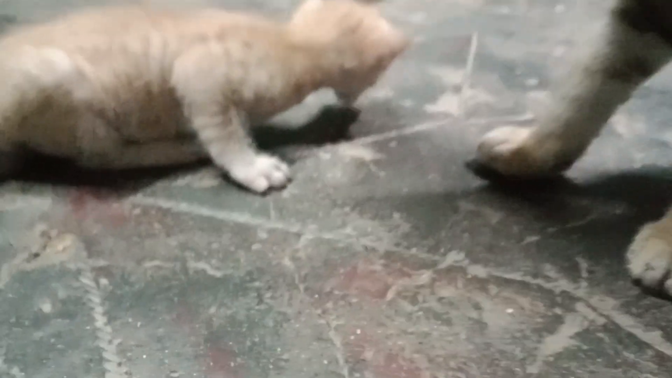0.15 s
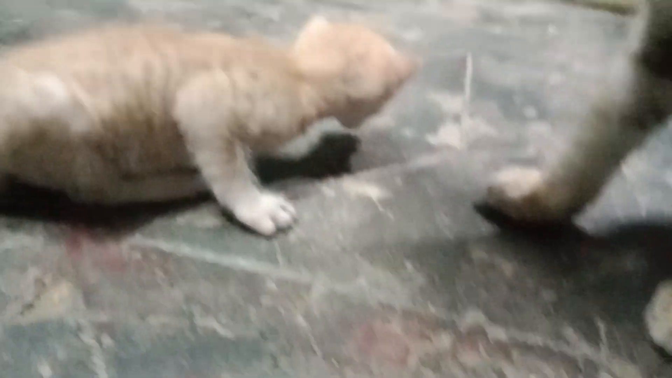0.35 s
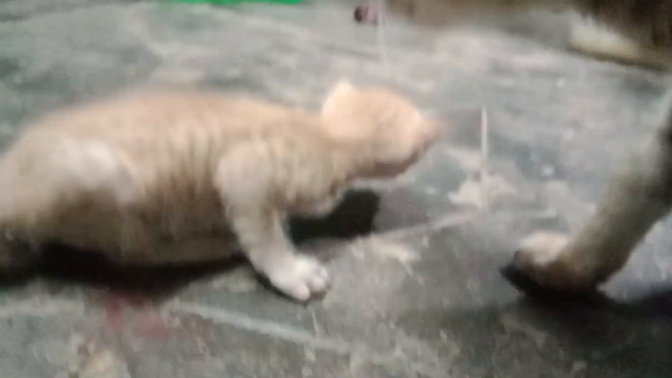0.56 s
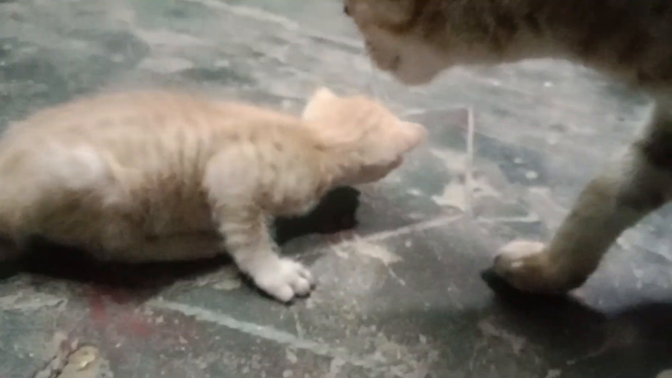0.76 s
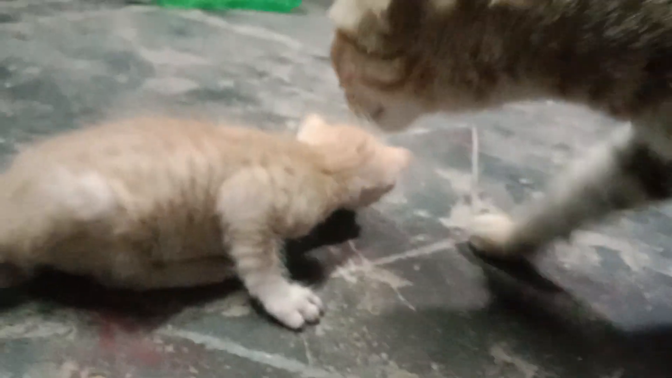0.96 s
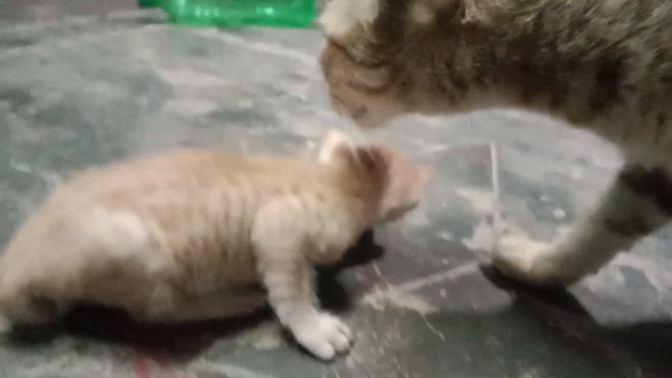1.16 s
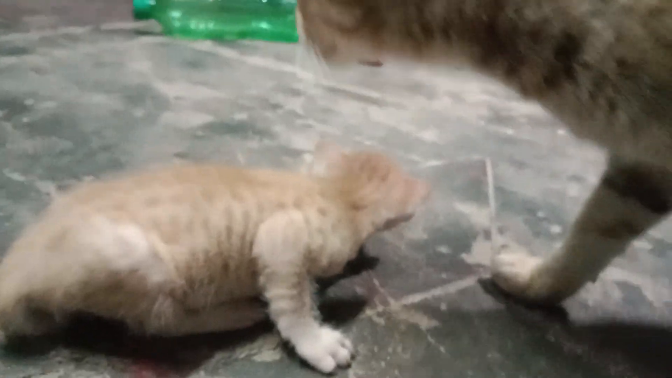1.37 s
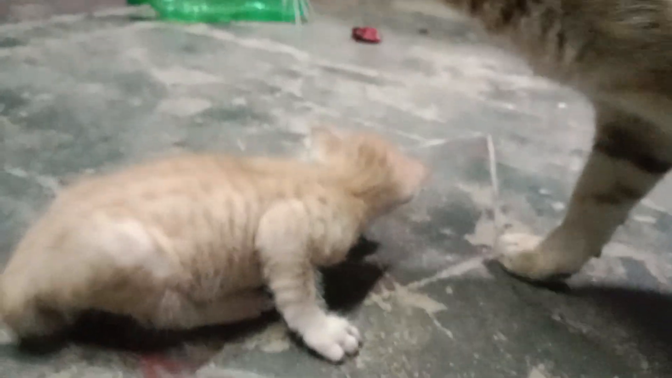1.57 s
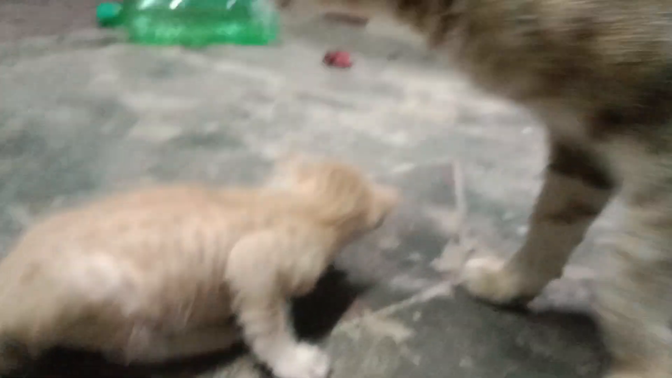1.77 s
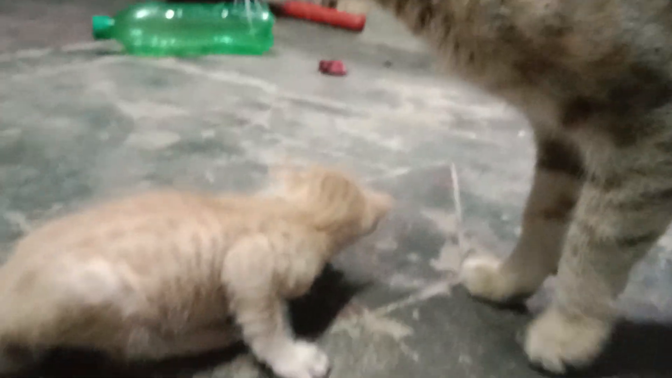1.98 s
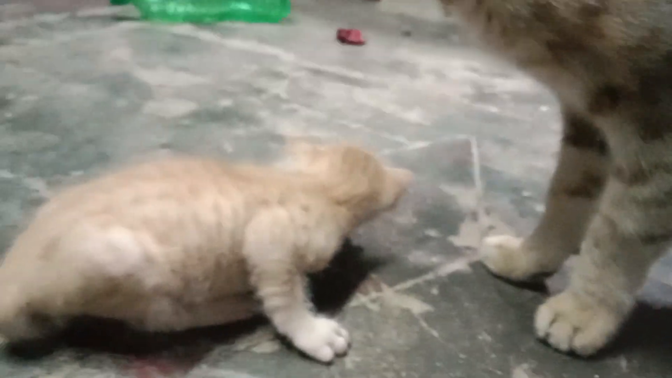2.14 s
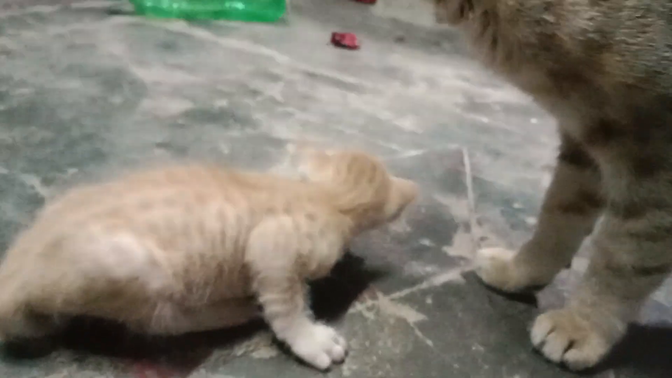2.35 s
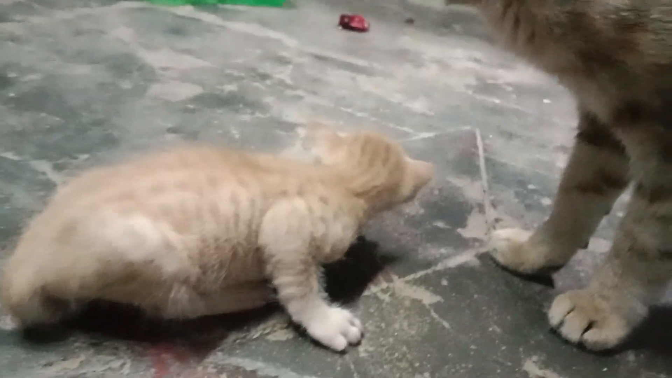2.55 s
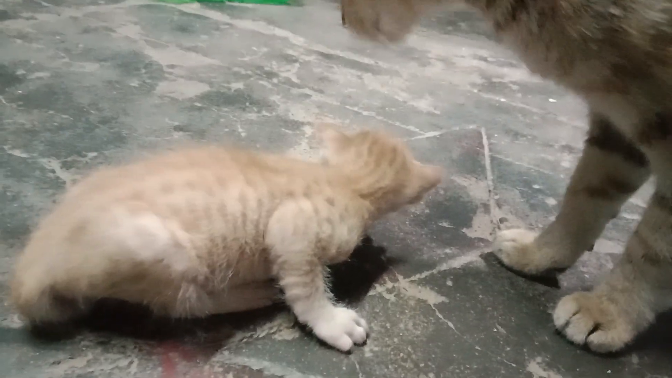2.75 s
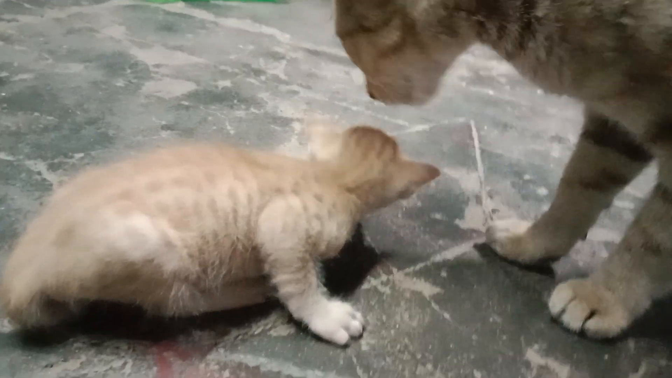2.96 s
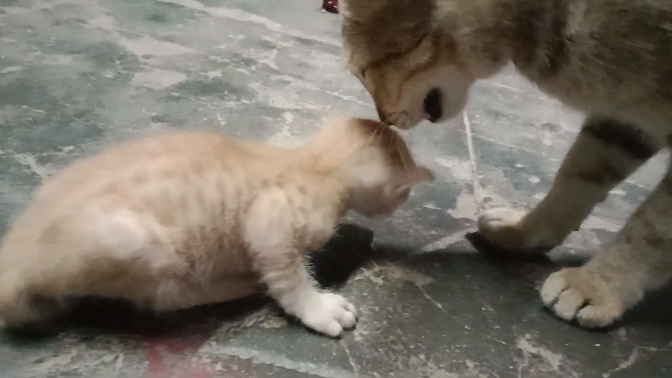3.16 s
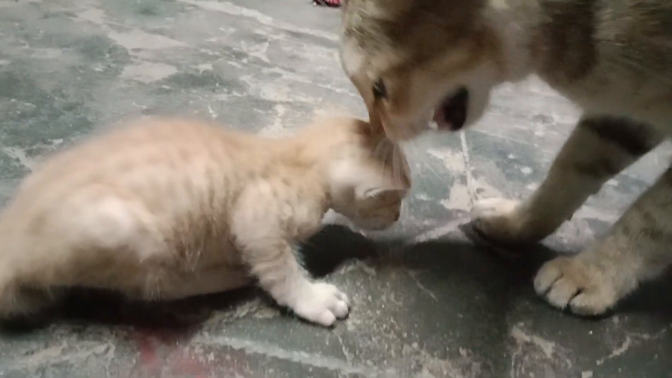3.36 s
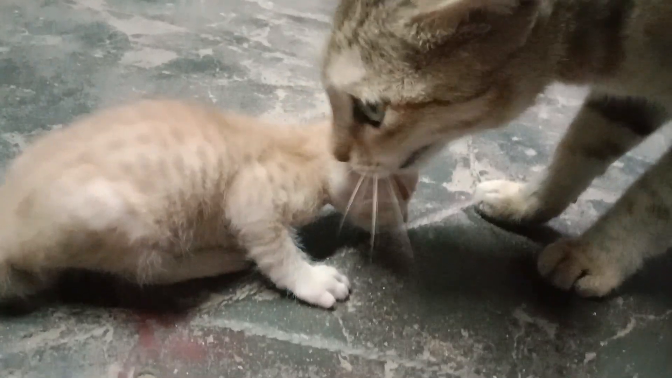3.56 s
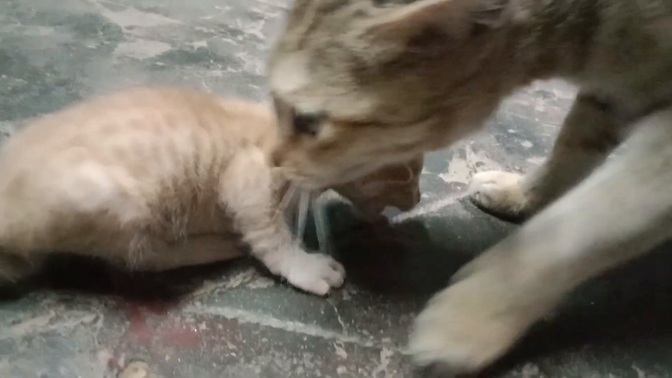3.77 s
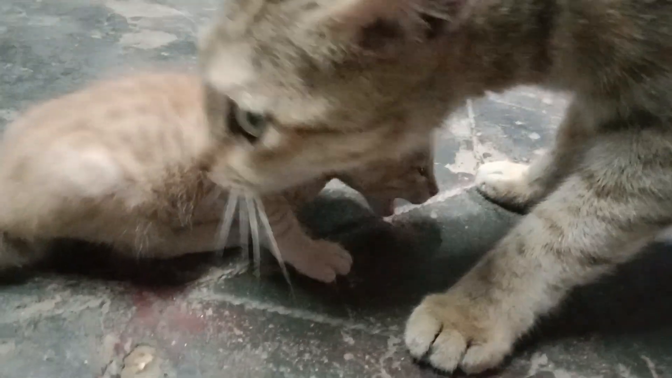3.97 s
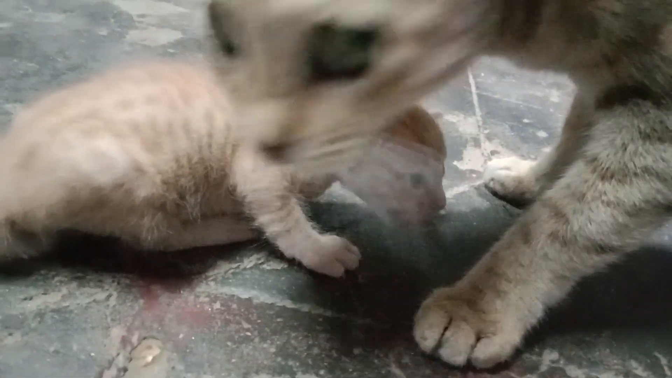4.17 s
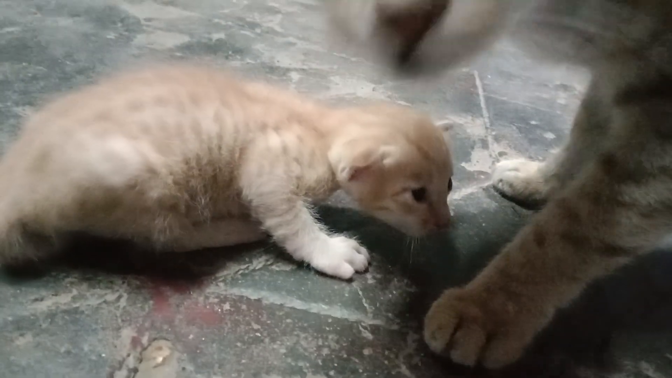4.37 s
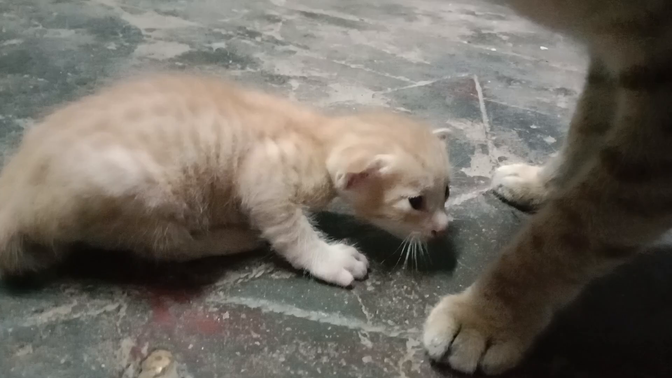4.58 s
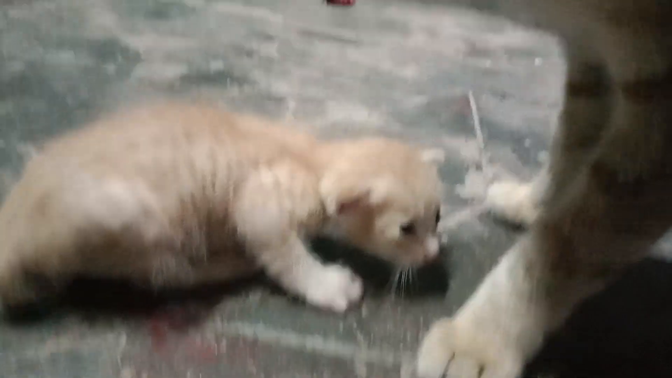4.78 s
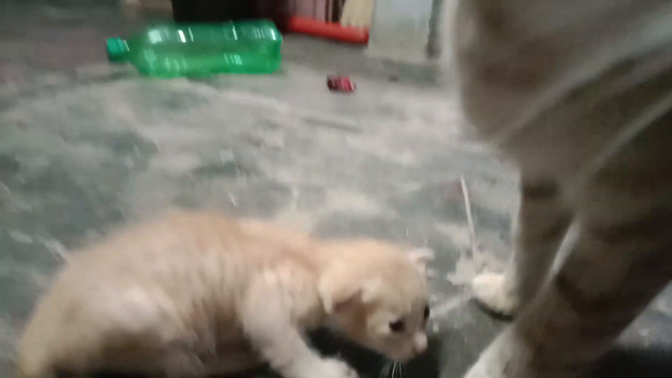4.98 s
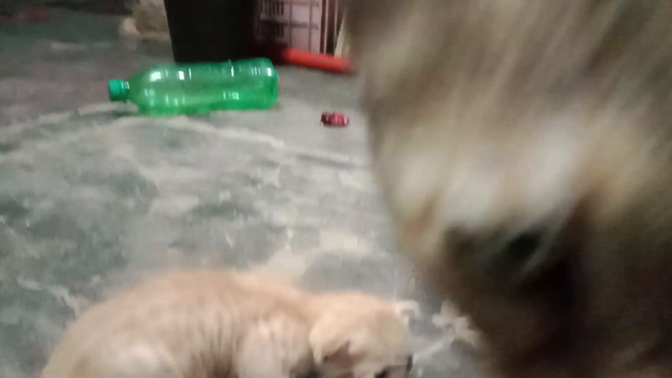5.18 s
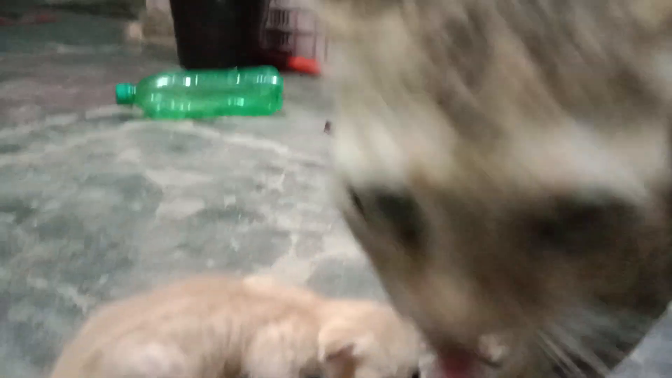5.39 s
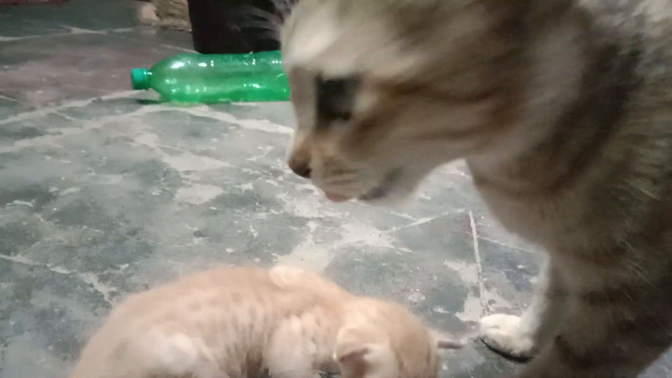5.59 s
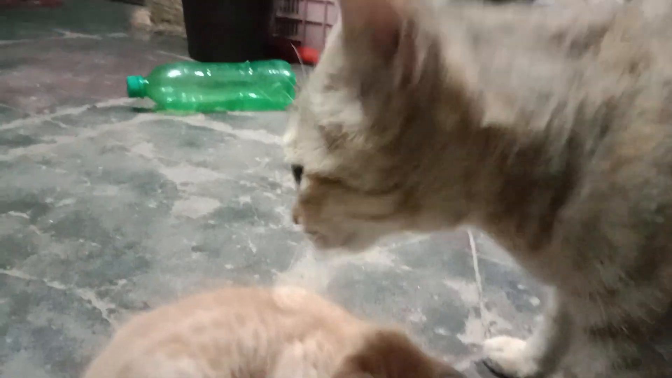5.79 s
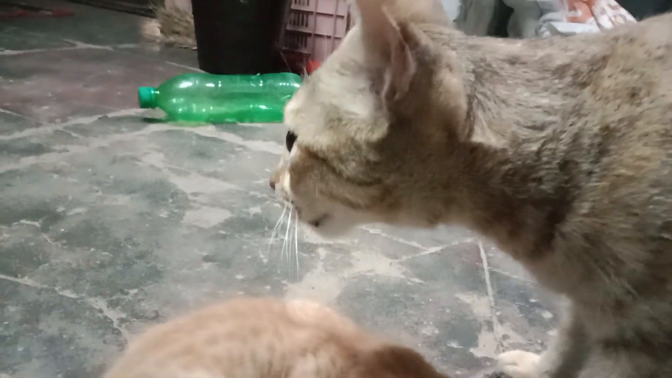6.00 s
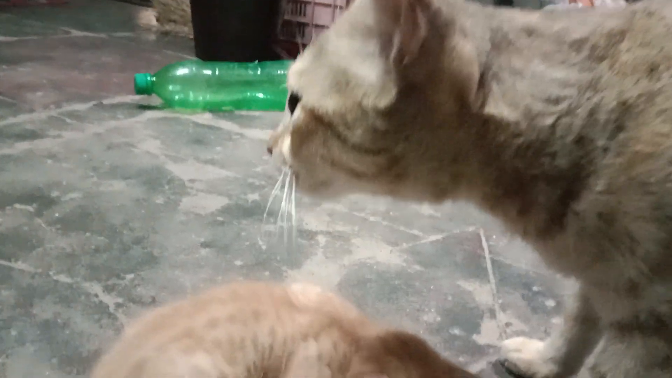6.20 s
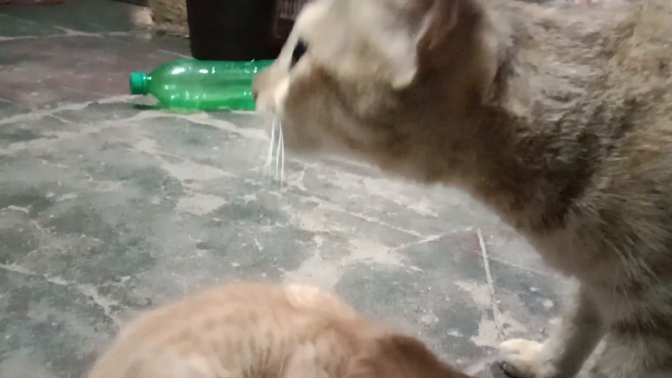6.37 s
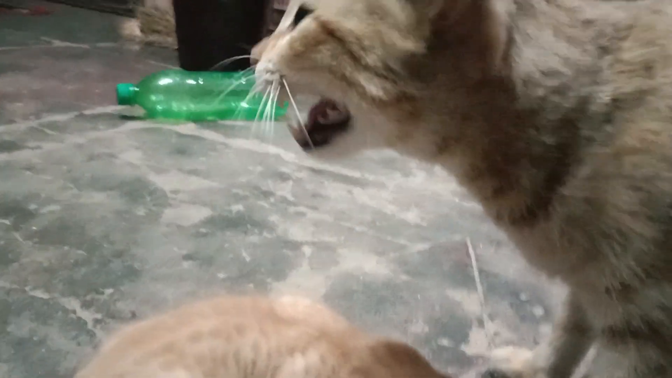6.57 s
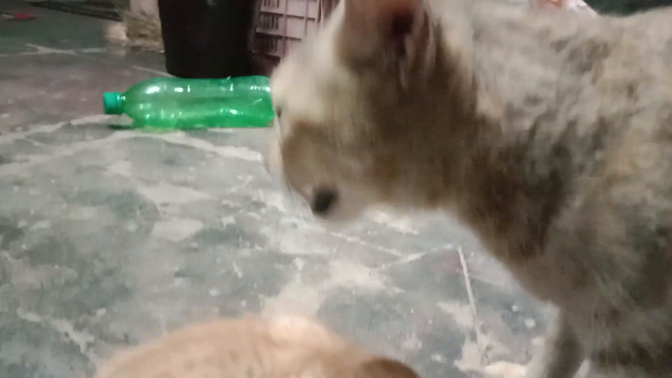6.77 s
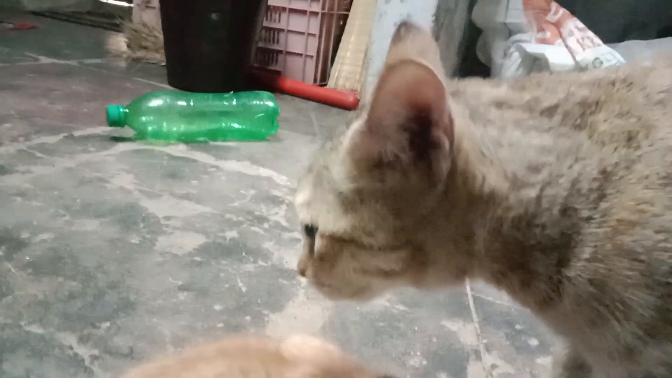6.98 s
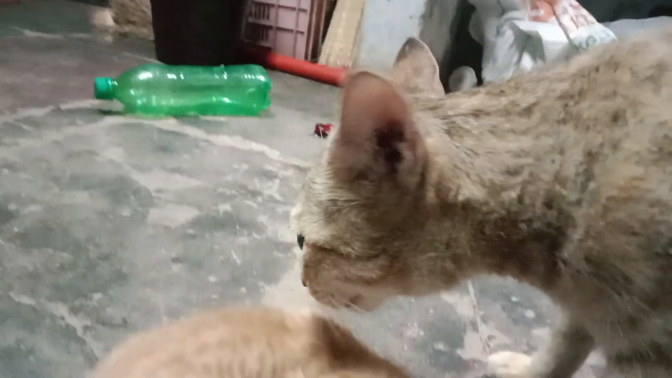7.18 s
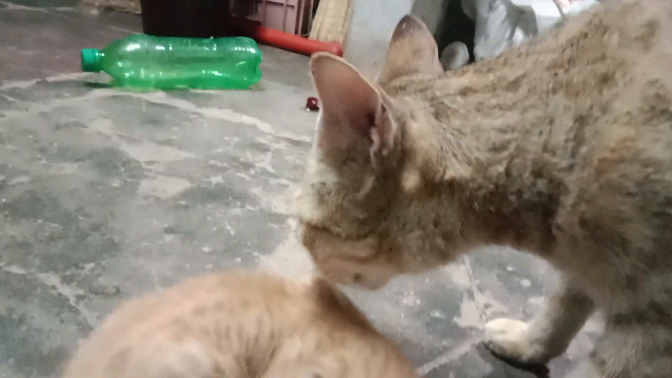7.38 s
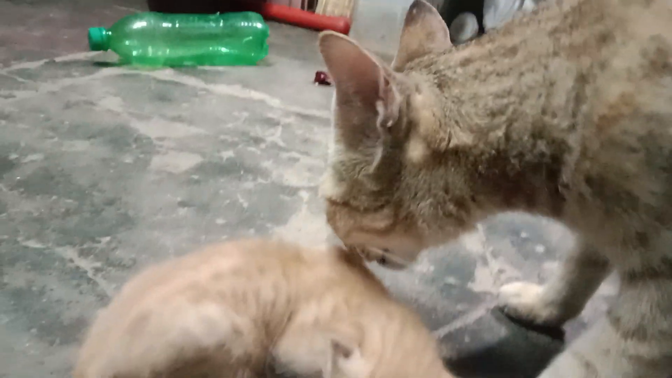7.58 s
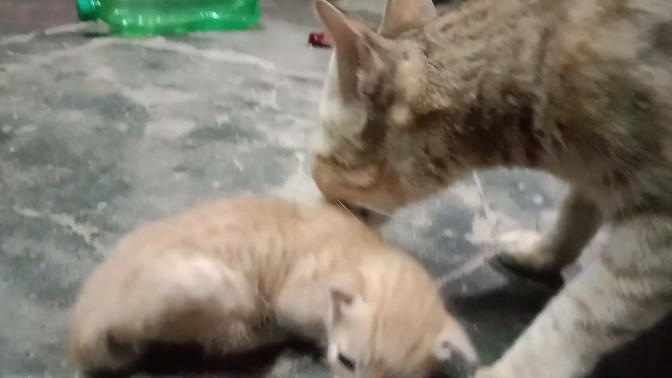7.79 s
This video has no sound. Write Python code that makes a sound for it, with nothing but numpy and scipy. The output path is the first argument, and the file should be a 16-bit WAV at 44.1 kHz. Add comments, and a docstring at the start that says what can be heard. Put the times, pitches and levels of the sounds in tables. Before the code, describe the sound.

A very young kitten mews six times, close by, in a small, hard room with little echo. The high, thin calls start at about 0, 1.2, 2.3, 3.7, 5.4 and 6.6 seconds. Each lasts around two thirds of a second, rising, sagging, cracking and trailing off; the last three are the loudest. The mother cat hisses briefly at about 0.5 seconds and gives one lower, raspy meow from 3.1 to 3.8 seconds, running into the fourth mew. Paws tick and shuffle faintly on the stone floor, mostly around 2, 3 and 6 seconds, with a few soft, low bumps scattered throughout. After two seconds of faint handling rumble, a small engine outside, likely a motorbike, putters closer. It is strongest at about 4.5 seconds, has a faint squeal near 5 seconds and then quickly fades to a low background hum.

```python
"""In a small hard room with a stone floor, a very young kitten mews six times, close by.
Its vocal folds give a harmonic series that the resonances of its throat colour. The mother cat hisses
once (turbulent air) and answers with one low, raspy meow (period doubling). Paws tick on the floor
among soft, low bumps. After two seconds of faint handling rumble, a small engine, likely a motorbike
outside, putters up and fades away, its periodic firings droning through the exhaust."""
import sys
import numpy as np
from scipy import signal
from scipy.fft import rfft, irfft, next_fast_len
from scipy.io import wavfile
from scipy.ndimage import uniform_filter1d, map_coordinates

SR = 44100
rng = np.random.default_rng(int(sys.argv[2]) if len(sys.argv) > 2 else 0)


def inscribe(sig):
    """Save sig as 16-bit PCM at rate SR to the path in sys.argv[1].

    A 1-D sig is mono; a 2-D sig holds one channel per row.
    Samples are clipped to [-1, 1] before scaling.
    """
    pcm = np.round(np.clip(np.atleast_2d(sig).T, -1, 1) * 32767)
    wavfile.write(sys.argv[1], SR, pcm.astype(np.int16))


N = 345744

# A mew climbs to a crest, sags, breaks into a weaker register and trails off. Levels are relative.
# (start [s], crest [s], break [s], end [s], crest pitch [Hz], pitch before the break [Hz], jump [Hz],
#  end pitch [Hz], sag exponent [1], fundamental [dB], overtones [dB], loss below the crest [dB/Hz],
#  overtone loss at the start [dB], rasp [dB])
MEWS = [(-.04, .11, .305, .62, 1312, 1118, 65, 1105, 1.9, -41, -44.5, 0, -3, -64),
        (1.17, 1.33, 1.58, 1.91, 1376, 1135, 0, 770, 1.38, -39, -34, .023, 3, -51),
        (2.28, 2.5, 2.78, 2.95, 1342, 1028, -25, 780, 1.03, -37.5, -32, .016, 10, -46),
        (3.65, 3.85, 4.215, 4.365, 1370, 1050, 50, 730, 1.9, -31.5, -26, .016, 8, -40),
        (5.355, 5.5, 5.772, 5.97, 1375, 1110, 118, 777, 3.1, -26.5, -23, .043, 36, -45),
        (6.6, 6.735, 7.014, 7.21, 1393, 1082, 100, 710, 2.08, -25.4, -22.5, .043, 15, -31)]
# the piercing second harmonic, one curve per mew: (time [s], relative level [dB])
OCTAVE_LEVELS = [
    [(0.008, -45), (0.023, -55.5), (0.123, -20.5), (0.193, -30.5), (0.223, -25.5), (0.358, -46),
     (0.363, -39.5), (0.558, -59), (0.608, -78)],
    [(1.188, -63.5), (1.323, -34.5), (1.393, -20.5), (1.498, -15.5), (1.568, -24), (1.578, -21),
     (1.783, -52.5), (1.833, -42), (1.898, -54)],
    [(2.298, -62), (2.423, -38), (2.488, -37.5), (2.533, -28), (2.648, -25.5), (2.658, -30.5), (2.733, -25),
     (2.893, -33.5), (2.938, -45)],
    [(3.668, -62), (3.683, -45), (3.808, -29), (3.993, -20), (4.128, -21), (4.188, -13.0), (4.303, -40.5),
     (4.313, -22), (4.348, -35)],
    [(5.368, -54), (5.378, -35.5), (5.518, -15.5), (5.623, -14), (5.638, -19.5), (5.663, -10.5),
     (5.773, -17.5), (5.798, -37), (5.958, -51.5)],
    [(6.608, -63), (6.623, -41.5), (6.718, -19.5), (6.728, -23.5), (6.768, -12), (6.993, -15.0),
     (7.128, -57), (7.168, -45), (7.198, -67)],
]
# the kitten's throat response, mouth wide open and nearly closed: (frequency [Hz], gain [dB])
THROAT_OPEN = [(3400, -7), (4150, -3), (4700, -3), (5400, 3), (6000, -9), (6800, -0.5), (7400, -19.5),
               (8000, -11), (9300, -20), (11700, -16), (13200, -26.5), (15000, -25)]
THROAT_CLOSED = [(2400, -10), (3400, 6), (4300, -15), (5700, -13), (7200, -13), (9300, -24), (11500, -18),
                 (14500, -15)]
# spectra of its rasp and of air rushing through its folds: (frequency [Hz], level [dB])
RASP_COLOUR = [(500, -30), (1700, -21), (2500, 9), (3700, 4), (4600, -10), (5600, -11.5), (6900, -7.5),
               (9000, -16.5), (11500, -16), (15000, -16.5)]
BREATH_COLOUR = [(2000, -1), (3400, -0.5), (4300, -11.5), (6000, -1.5), (9000, -2.5), (11500, -3.5),
                 (15000, -12.5)]
# the mother's meow: (time [s], pitch [Hz], relative level [dB])
MEOW = [(3.141, 403.3, -46.5), (3.22, 466.6, -37.5), (3.331, 470, -40), (3.439, 542.5, -38.5),
        (3.53, 539.5, -39), (3.676, 476.7, -31), (3.74, 350, -35.5), (3.779, 342, -61)]
# her throat response: (frequency [Hz], gain [dB])
MOTHER_THROAT = [(250, 4), (480, -1), (700, -8), (1000, 4.5), (1400, -4), (2000, -8), (3000, -9.5),
                 (3500, -4.5), (4400, -7.5), (5100, 2), (5800, -19), (7600, -7), (9000, -19.5),
                 (15000, -25.5)]
# air through her open mouth, alone and within the meow: (frequency [Hz], level [dB])
HISS_COLOUR = [(200, -15.5), (430, 5.5), (750, -3.5), (950, -9), (1600, -5), (2300, -16), (3300, -8),
               (4300, -13), (5500, 4.5), (6500, 3), (7800, -7.5), (10000, -11), (13000, -7.5),
               (15000, -13.5)]
SNARL_COLOUR = [(600, -8.5), (1100, 5), (2000, -1.5), (2900, -5), (3500, -12), (4200, -11), (5200, 9),
                (5700, -5), (7700, -0.5), (8800, -13.5), (10800, -21), (12300, -37.5), (14000, -2.5),
                (15400, -11)]
# paw and claw contacts: (time [s], relative level [dB], 60 dB decay time [s])
TICKS = [(.665, -50, .05), (2.015, -43.5, 0.033), (2.881, -48.5, 0.028), (3.065, -48, 0.071),
         (3.158, -42.5, 0.06), (3.25, -51, 0.2), (5.969, -43.5, .25)]
# shuffling paws: (start [s], attack [s], hold [s], release [s], relative level [dB])
SHUFFLES = [(1.4, .15, 1.3, .6, -66), (4.6, .2, .26, .14, -58)]
# spectrum of paws on stone: (frequency [Hz], level [dB])
PAW_COLOUR = [(1000, -21), (3500, -23.5), (5500, 3.5), (8000, -0.5), (11000, -5.5), (15000, -10)]
# engine speed: (time [s], firing rate [Hz])
FIRING_RATE = [(0, 25.5), (2.5, 25.4), (3.5, 26.3), (4.4, 28.4), (4.8, 25.9), (5.2, 30.5), (7.84, 26.2)]
# exhaust harmonics: (multiple of the firing rate [1], level [dB])
EXHAUST_HARMONICS = [(2, -6.5), (3, -6), (4, 0), (5, 0.5), (6, -10.5), (7, 5.5), (8, 0.5), (9, -14.5),
                     (10, -6), (11, -4), (12, -11.5), (14, -8), (16, -22)]
# faint handling rumble for two seconds, then the engine's exhaust: (time [s], relative level [dB])
LOW_RUMBLE_LEVEL = [(0, -61), (.98, -64), (1.2, -88), (1.4, -69), (1.8, -60), (2.2, -50), (2.5, -39.5),
                    (3.1, -46.5), (3.5, -39), (4.1, -39), (4.35, -34.5), (4.78, -37.5), (4.9, -47),
                    (5.1, -43.5), (5.24, -61.5), (5.75, -59.5), (6.3, -67.5), (7.84, -76)]
# envelope of the mechanical rush: (time [s], relative level [dB])
RUSH_LEVEL = [(0, -59), (.7, -77), (1.2, -72), (1.9, -53.5), (2.3, -53), (2.8, -43.5), (3.1, -43),
              (3.6, -37), (4.2, -38.5), (4.65, -36.5), (4.79, -37), (4.85, -43.5), (5.1, -55), (5.3, -61),
              (6.5, -67.5), (7.84, -77.5)]
# spectra of the rush and of the noise in the low rumble: (frequency [Hz], level [dB])
RUSH_COLOUR = [(88, -36.5), (150, -8.5), (193, -8), (258, -11), (366, -13), (445, -14), (844, -22),
               (930, -15.5), (1480, -12.5), (2140, -22.5), (2980, -21.5), (4390, -29), (5870, -23.5),
               (10700, -47.5), (15500, -49)]
RUMBLE_COLOUR = [(30, -32.5), (60, -13), (130, 17), (220, 1), (400, -13), (900, -42.5), (3000, -94)]
# the engine's body, its deep bass and low mids: (frequency [Hz], share [1])
BODY_BANDS = [(55, .6), (85, .09), (215, .2), (300, 1), (750, .67), (1000, .023)]
# gain of that body as the engine nears: (time [s], gain [dB])
BODY_GAIN = [(2.3, -10), (2.9, -0.5), (4.5, 3)]
# soft bumps of handling and steps: (time [s], level [dB], half length [s])
BUMPS = [(0.099, -53.5, 0.16), (.352, -48.5, .036), (0.544, -47.5, 0.097), (1.459, -53.5, 0.14),
         (1.658, -47, .05), (2.063, -57.5, 0.044), (5.016, -61.5, .06), (5.78, -52.5, 0.025),
         (7.061, -55.5, 0.082)]
# spectra of the bumps and of the steady background: (frequency [Hz], level [dB])
BUMP_COLOUR = [(40, -27.5), (80, -10.5), (130, 4), (200, -1.5), (280, -21.5), (450, -25.5), (1500, -53.5)]
BACKGROUND_COLOUR = [(18, -46), (30, -23), (55, 2.5), (147, -5.5), (253, -9.5), (460, -22.5), (1170, -23.5),
                     (1270, -17.5), (2080, -34), (5300, -35), (15000, -36)]
# the room's reverberation: (frequency [Hz], 60 dB decay time [s])
ROOM_DECAY = [(200, 0.24), (2500, 0.22), (7000, 0.13), (15000, 0.067)]


def kitten():
    """Superposition: six mews, each carrying the turbulent noise of breath and rasp."""
    breath = amp(-24) * noise(BREATH_COLOUR)
    rasp = noise(RASP_COLOUR) * amp(2 * wobble(260, np.arange(N) / SR))
    return amp(-.5) * sum(mew(row, octave, breath, rasp) for row, octave in zip(MEWS, OCTAVE_LEVELS))


def mew(row, octave_curve, breath, rasp):
    """Source and filter: the vibrating folds glide through an arch of pitch and drive the throat."""
    onset_hz, jump_s, poise_s, jaw_lag_s = 780, .018, .016, .03
    start, crest, crack, end, crest_hz, low_hz, jump_hz, end_hz, dome = row[:9]
    body_db, bright_db, slack_db_per_hz, soft_db, rasp_db = row[9:]
    i, gate = span(start, end)
    t = i / SR
    unclimbed = 1 - ramp(t, start, crest - start)
    sag = ramp(t, crest, crack - crest - poise_s)
    jump = ramp(t, crack, jump_s)
    trail = ramp(t, crack, end - crack)
    pitch = crest_hz - (crest_hz - onset_hz) * unclimbed ** 1.66 - (crest_hz - low_hz) * sag ** dome
    pitch += jump_hz * jump - (low_hz + jump_hz - end_hz) * trail ** 1.65
    # effort follows the pitch; the octave swells on its own; all levels waver
    effort_db = -slack_db_per_hz * (crest_hz - pitch)
    fundamental_db = body_db + effort_db - 18.5 * unclimbed - 13 * trail ** 3 + 2.2 * wobble(45, t)
    muffled = 1 - ramp(t, start, crest - start + .094)  # clears just after the crest
    lips_shut = 1 - ramp(t, start, .06)
    overtone_db = bright_db + effort_db - soft_db * muffled ** 2 - 23.5 * lips_shut
    overtone_db += 1.1 * wobble(35, t) - 7 * sag - 3 * jump - 30 * trail
    octave_db = curves(octave_curve, t)[0] - .7 + 1.5 * wobble(60, t)
    # the rasp peaks just before the crest, rising faster than it falls
    past_peak = t - crest + .035
    hoarse = amp(rasp_db) * np.exp(-(past_peak / np.where(past_peak < 0, .04, .085)) ** 2)
    # the mouth opens as the pitch climbs, a moment late; the voice is rough while it climbs
    closed_hz, open_hz = 1090, 1290
    earlier_pitch = np.interp(t - jaw_lag_s, t, pitch)
    mouth = np.clip((earlier_pitch - closed_hz) / (open_hz - closed_hz), 0, 1)
    strain = np.clip((pitch - earlier_pitch) / 100, 0, 1)
    jitter = .0027 * (wobble(260, t) + 1.3 * wobble(45, t)) + .015 * strain * wobble(450, t)
    phase = phase_of(pitch * (1 + jitter))
    # a second, slower oscillator in the larynx modulates the phase
    slow_phase = phase_of(.44 * pitch * (1 + .026 * wobble(200, t)))
    phase += amp(12) * hoarse * np.sin(slow_phase)
    fundamental = amp(fundamental_db) * np.sin(phase)
    octave = amp(octave_db + .6 * wobble(70, t)) * np.sin(2 * phase)
    leak = breath[i] * (1 - .4 * mouth)
    overtones = amp(overtone_db) * (throat(t, pitch, phase, mouth, trail) + leak)
    out = np.zeros(N)
    out[i] = gate * (np.sqrt(2) * (fundamental + octave + overtones) + hoarse * rasp[i])
    return out


def throat(t, pitch, phase, mouth, trail):
    """Formant filtering: harmonics 3 to 16 slide through resonances that change as the mouth opens."""
    k = np.arange(3, 17)[:, None]
    hz = k * pitch
    gains = amp(mouth * along(THROAT_OPEN, hz) + (1 - mouth) * along(THROAT_CLOSED, hz)) * (hz < SR / 2)
    gains /= np.linalg.norm(gains, axis=0)
    flutter_db = 3.3 * np.array([wobble(50, t) for _ in k])
    tilt_db = 3.5 * trail * (k - 3)  # higher harmonics fade less as the mew trails off
    return np.sum(gains * amp(flutter_db + tilt_db) * np.sin(k * phase), axis=0)


def mother_meow(jitter=.007, doubling=.8, muffle_db_per_octave=-10.5):
    """Period doubling: as the mouth opens, the voice brightens and gains half-integer harmonics."""
    i, gate = span(MEOW[0][0], MEOW[-1][0])
    t = i / SR
    pitch, level_db = curves(MEOW, t)
    gape = ramp(t, start=3.315, length=.04) - ramp(t, start=3.575, length=.11)
    mouth = .22 + .78 * gape
    phase = phase_of(pitch * (1 + jitter * wobble(220, t)))
    voice = np.zeros(len(t))
    for k in np.arange(2, 58) / 2:
        muffle_db = muffle_db_per_octave * (1 - mouth) * np.log2(np.maximum(k * pitch / 1000, 1))
        strength = doubling * mouth if k % 1 else 1
        gain = strength * amp(along(MOTHER_THROAT, k * pitch) + muffle_db + 3.2 * wobble(45, t))
        voice += gain * np.sin(k * phase + rng.uniform(0, 2 * np.pi))
    airflow = swell(start=3.302, attack=.024, hold=.14, release=.42, db=-35)
    snarl = airflow * patchy(noise(SNARL_COLOUR), depth_db=-3.5)
    puffs = 1 + .83 * np.cos(phase / 2)  # one per double cycle of the folds
    out = np.zeros(N)
    out[i] = gate * amp(level_db - 3) * voice + snarl[i] * puffs
    return out


def mother_hiss():
    """Turbulence: air forced through the open mouth makes broadband noise, coloured by resonance."""
    return swell(start=.37, attack=.125, hold=.04, release=.18, db=-35) * noise(HISS_COLOUR)


def paws():
    """Impact and friction: gritty ticks on stone decay exponentially, among faint shuffles."""
    t = np.arange(N) / SR
    ticks = sum((t >= onset) * amp(db - 60 * np.abs(t - onset) / t60) for onset, db, t60 in TICKS)
    shuffles = sum(swell(*row) for row in SHUFFLES) * amp(3 * wobble(26, t))
    return (ticks + shuffles) * noise(PAW_COLOUR) * amp(1.7 * wobble(600, t) - 1)


def engine_and_rumble(throb=.14, squeal_hz=1454):
    """Periodic excitation: after a faint handling rumble, firings drone and pulse a mechanical rush."""
    t = np.arange(N) / SR
    phase = phase_of(curves(FIRING_RATE, t)[0] * (1 + .0028 * wobble(7.4, t)))
    drone = sum(amp(db + 1.8 * wobble(7.5, t)) * np.sin(k * phase + rng.uniform(0, 2 * np.pi))
                for k, db in EXHAUST_HARMONICS)
    low_rumble = amp(curves(LOW_RUMBLE_LEVEL, t)[0]) * unit(unit(drone) + .4 * noise(RUMBLE_COLOUR))
    rush = amp(curves(RUSH_LEVEL, t)[0]) * patchy(noise(RUSH_COLOUR), depth_db=2.8)
    rush *= 1 + throb * np.cos(phase)
    squeal = np.sin(phase_of(squeal_hz * (1 + .011 * wobble(77, t))))
    squeal *= swell(start=4.64, attack=.17, hold=.17, release=.36, db=-48)
    sound = low_rumble + rush + squeal
    # the sound stays hollow until the engine is near
    body = filtered(sound, lambda hz: along(BODY_BANDS, hz))
    return sound + (amp(curves(BODY_GAIN, t)[0]) - 1) * body


def bumps():
    """Soft impacts: slow contact puts its energy at low frequencies, in dull thuds that swell and die."""
    t = np.arange(N) / SR
    push = sum(amp(db) * np.exp(-((t - centre) / half) ** 2) for centre, db, half in BUMPS)
    return push * noise(BUMP_COLOUR)


def room(x):
    """Reverberation: reflections merge into a diffuse tail whose treble is absorbed first."""
    hz, t, spectrum = signal.stft(rng.standard_normal(SR // 2), SR, nperseg=256)
    decay = amp(-60 * t / along(ROOM_DECAY, hz)[:, None])
    tail = signal.istft(spectrum * decay, SR, nperseg=256)[1]
    tail = np.pad(tail, (SR // 200, 0))  # reflections begin after 5 ms
    return signal.fftconvolve(x, tail / np.linalg.norm(tail))[:N]


def background():
    """Stationary noise: a faint, steady rumble."""
    return amp(-70.5) * noise(BACKGROUND_COLOUR)


def amp(db):
    """Decibels to amplitude ratio."""
    return 10 ** (np.asarray(db) / 20)


def unit(x):
    """Normalisation to rms 1."""
    return x / np.sqrt(np.mean(x ** 2) + 1e-20)


def phase_of(hz):
    """Phase in radians, the integral of frequency."""
    return 2 * np.pi * np.cumsum(hz) / SR


def along(points, hz):
    """Interpolation of (frequency [Hz], value) points on a logarithmic axis."""
    frequencies, values = np.transpose(points)
    return np.interp(np.log(hz + 1), np.log(frequencies), values)


def curves(rows, t):
    """Linear interpolation, at times t, of each column after the time."""
    times, *columns = np.transpose(rows)
    return [np.interp(t, times, column) for column in columns]


def ramp(t, start, length):
    """Linear rise from 0 at start to 1 after length seconds."""
    return np.clip((t - start) / max(length, 1e-3), 0, 1)


def span(start, end):
    """Windowing: the sample numbers between two times, and a gate with tapered ends."""
    i = np.arange(max(0, int(start * SR)), min(N, int(end * SR)))
    return i, signal.windows.tukey(len(i), SR / 100 / len(i))


def swell(start, attack, hold, release, db, range_db=31.5):
    """Amplitude envelope that rises, holds and dies ever faster (times in seconds); zero outside."""
    gain = np.zeros(N)
    i, gate = span(start, start + attack + hold + release)
    quiet = 1 - ramp(i / SR, start, attack) + ramp(i / SR, start + attack + hold, release) ** 1.3
    gain[i] = gate * amp(db - range_db * quiet)
    return gain


def wobble(rate, t):
    """Random modulation: a smooth curve with rate knots a second."""
    knots = rng.standard_normal(int((t[-1] - t[0]) * rate) + 4)
    return map_coordinates(knots, [(t - t[0]) * rate])


def filtered(x, response):
    """Linear filtering: the spectrum of x times a frequency response."""
    size = next_fast_len(N + SR // 2)
    return irfft(rfft(x, size) * response(np.fft.rfftfreq(size, 1 / SR)), size)[..., :N]


def noise(colour):
    """Spectral shaping: coloured noise of rms 1, rolled off below 20 Hz."""
    return unit(filtered(rng.standard_normal(N), lambda hz: amp(along(colour, hz)) * hz / (hz + 20)))


def patchy(x, depth_db):
    """Random amplitude modulation, separate in each region of time and frequency; rms 1."""
    spectrum = signal.stft(x, nperseg=1024)[2]
    drift = uniform_filter1d(rng.standard_normal(spectrum.shape), size=9, axis=0)
    drift = uniform_filter1d(drift, size=12, axis=1)
    return unit(signal.istft(spectrum * amp(depth_db * unit(drift)), nperseg=1024)[1][:N])


def scene():
    """Superposition: the cats and their reverberation, over engine, rumble, background and bumps."""
    cats = kitten() + mother_meow() + mother_hiss() + paws()
    backdrop = engine_and_rumble() + background()
    return (cats + amp(-12.5) * room(cats) + backdrop + bumps())[None]


def record(dry, cutoff_hz=15600):
    """Band limiting: an ideal low-pass filter passes nothing above its cutoff."""
    return filtered(dry, lambda hz: hz < cutoff_hz)


dry = scene()
out = record(dry)
inscribe(out)
```